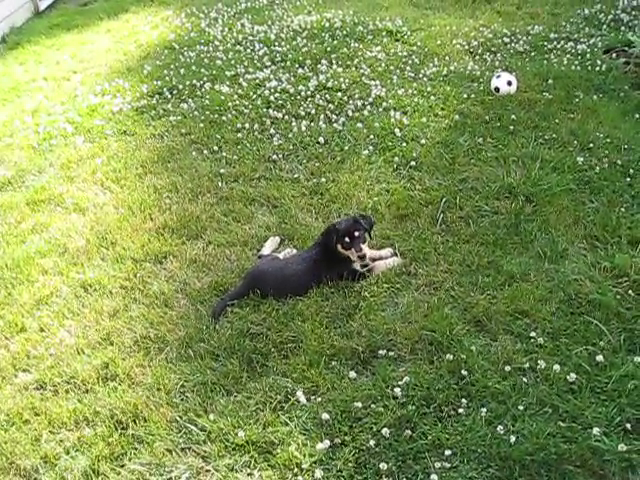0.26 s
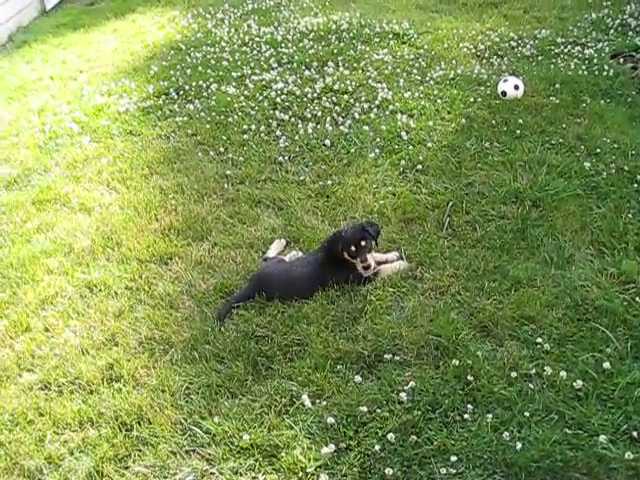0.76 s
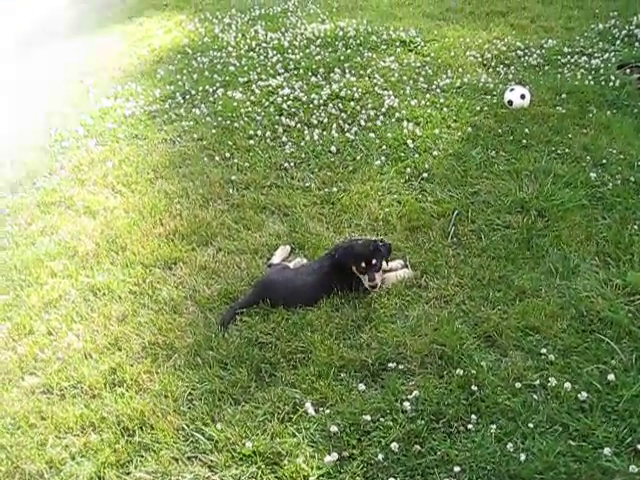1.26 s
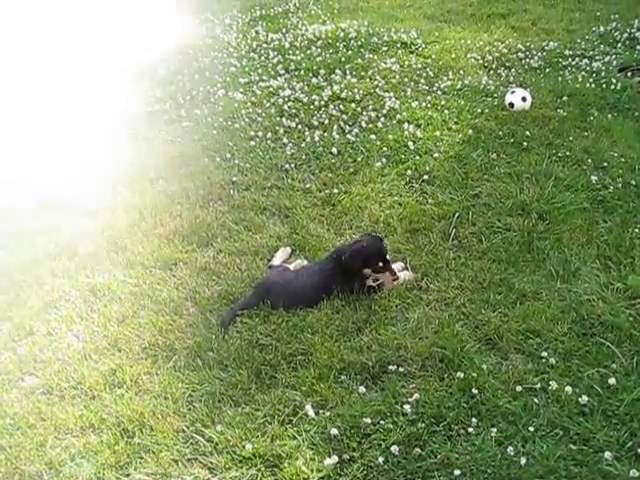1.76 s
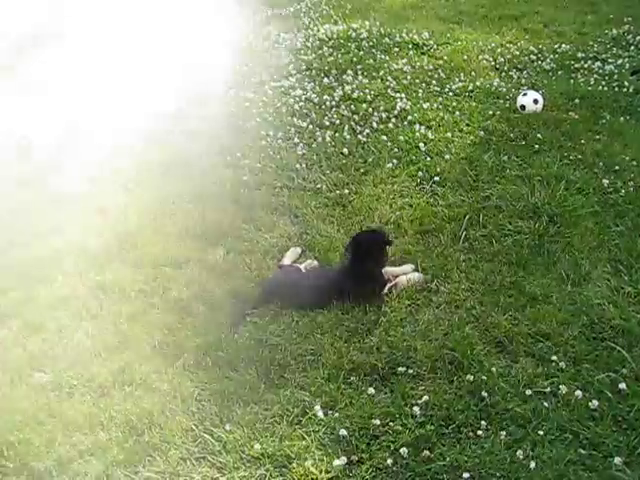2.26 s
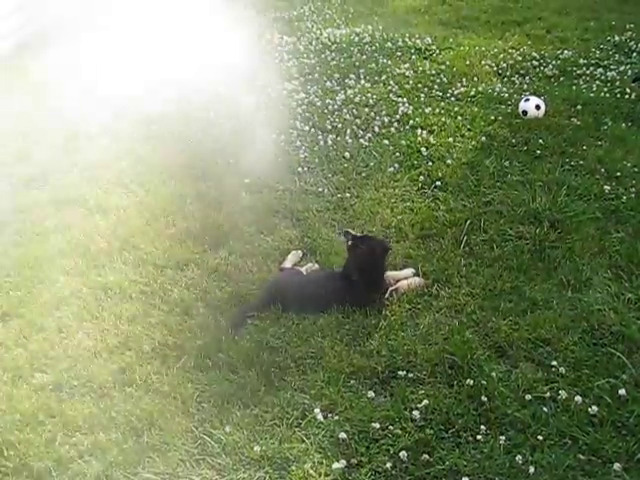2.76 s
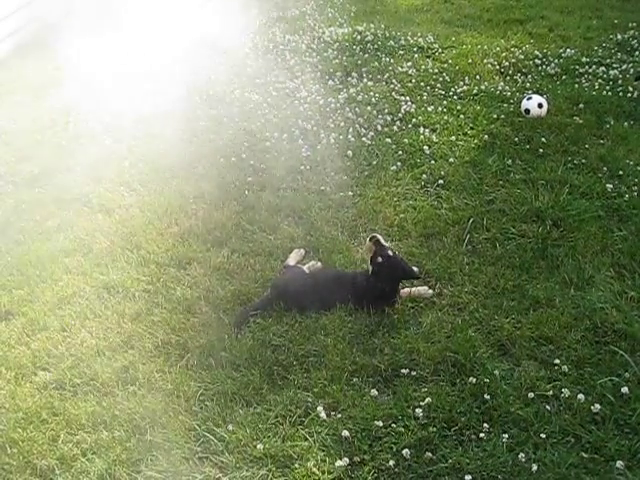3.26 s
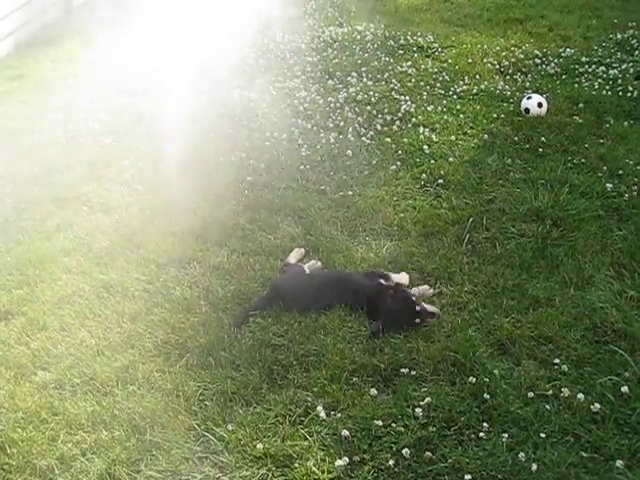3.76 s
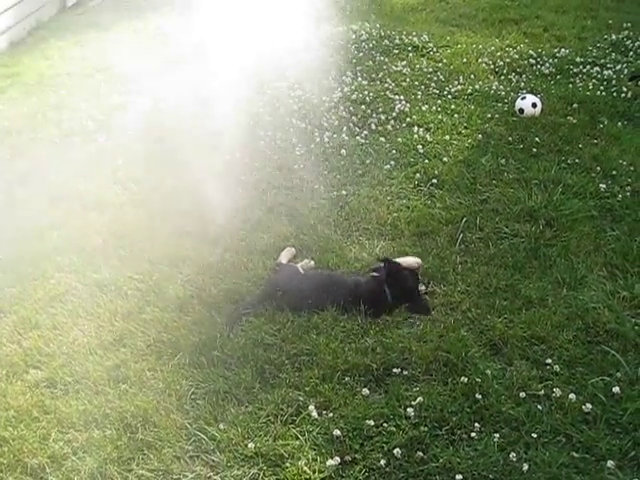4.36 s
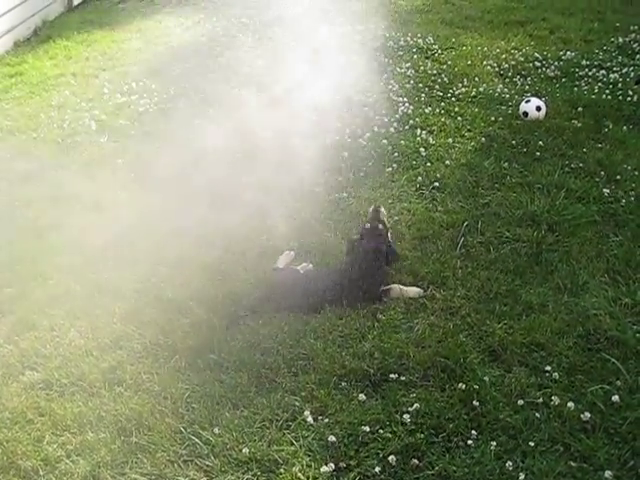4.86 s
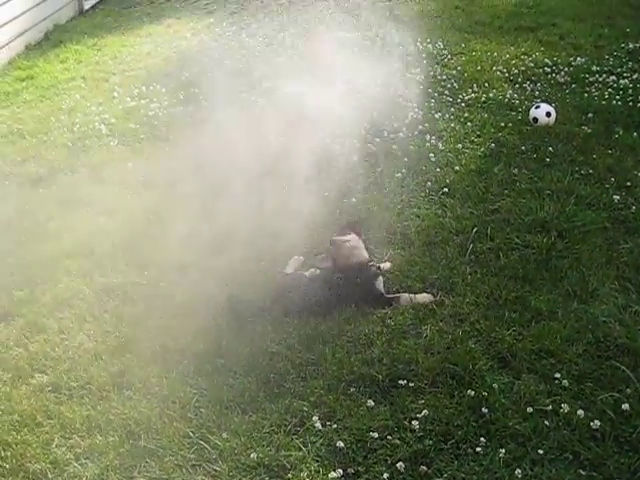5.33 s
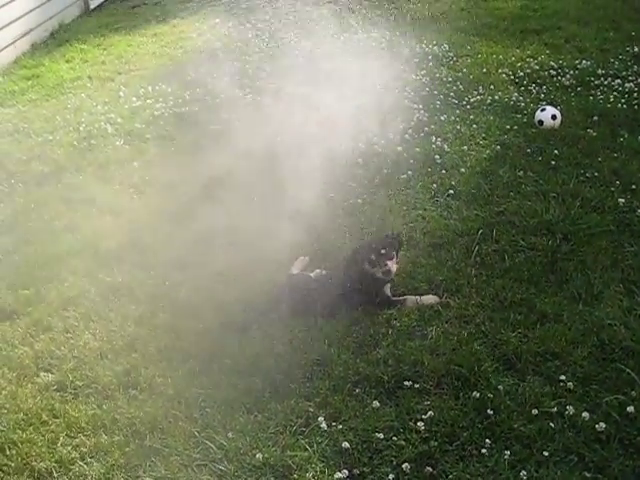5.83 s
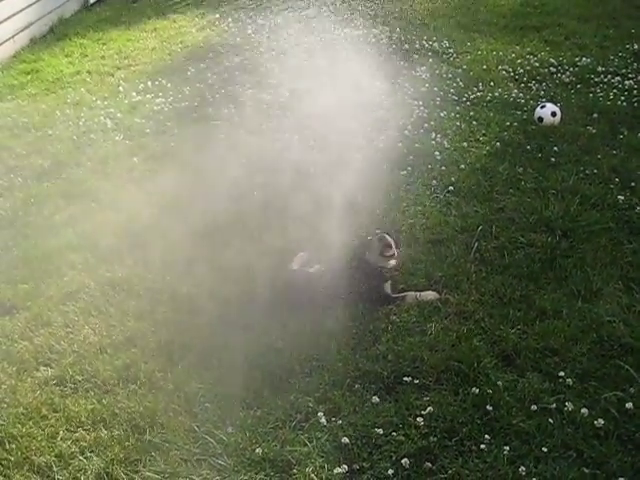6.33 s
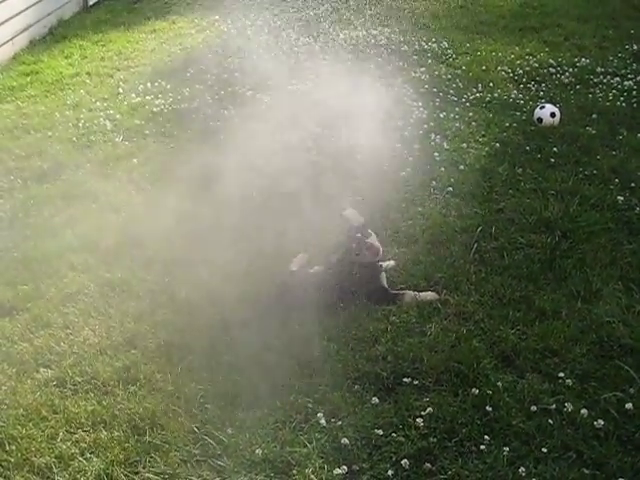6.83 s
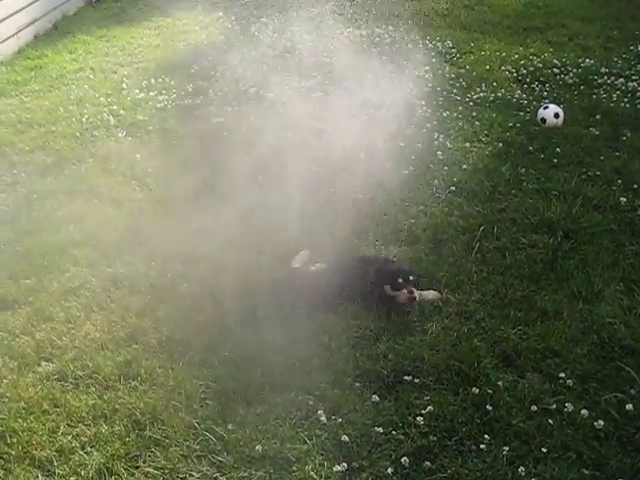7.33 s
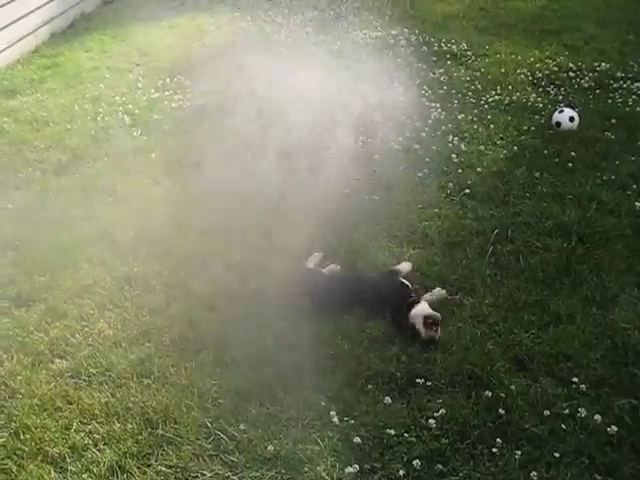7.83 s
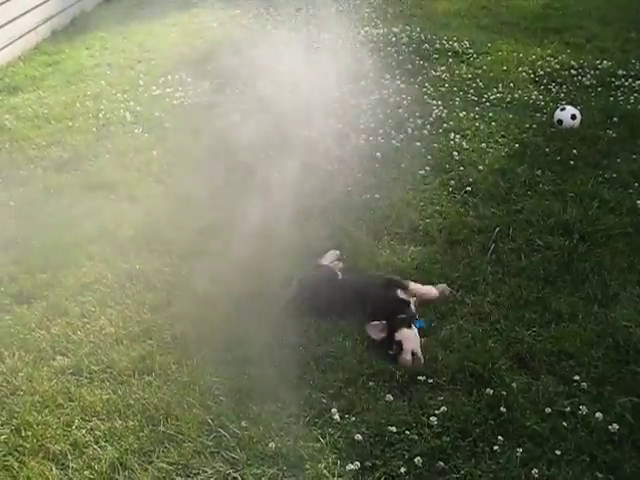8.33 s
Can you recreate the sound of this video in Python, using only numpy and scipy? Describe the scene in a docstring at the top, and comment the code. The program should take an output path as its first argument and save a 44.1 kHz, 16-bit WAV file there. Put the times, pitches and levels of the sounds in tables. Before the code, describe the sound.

A pressurised water spray hisses steadily over a lawn, brightening as it opens into mist, with a faint motor hum and a few small bird whistles.

```python
"""A pressure washer sprays a fine mist over a lawn, heard by one hand-held microphone close to the wand.
From the start: hiss (noise shaped by resonances), a pump hum behind (shaft-locked tones) and soft bumps
(ringing modes). The nozzle is twisted from tight jet to fan over 0.3-1.5 s and the wand swings nearer,
so the hiss brightens. A small bird whistles (gliding sines, faint echo) at 2.1-6.3 s; the grip
knocks near 5 and 6 s; hiss, hum and bumps run on to the end."""
import sys
import numpy as np
from scipy import signal
from scipy.io import wavfile

SR = 44100
rng = np.random.default_rng(int(sys.argv[2]) if len(sys.argv) > 2 else 0)


def store_wav(level_fs):
    """Save 16-bit WAV to argv[1]."""
    pcm = np.round(np.clip(np.atleast_2d(level_fs), -1, 1) * 32767)
    wavfile.write(sys.argv[1], SR, pcm.T.astype(np.int16))


N = 378819


def from_db(db):
    """Decibels to gain."""
    return 10 ** (np.asarray(db) / 20)


def in_time(rows, t):
    """Columns of a time table, interpolated at t."""
    s, *columns = np.transpose(rows)
    return [np.interp(t, s, column) for column in columns]


def at_hz(points, hz):
    """Spectrum table read on a log-frequency axis."""
    freqs, values = np.transpose(points)
    return np.interp(np.log(hz), np.log(freqs), values)


def bells(modes, hz):
    """Summed dB of bell-shaped peaks and hollows."""
    return sum(db * np.exp(-((hz - centre) / width) ** 2) for centre, width, db in modes)


def drift(rate_hz):
    """Random values of spread near 1, rate_hz a second, joined by straight lines."""
    knots = rng.standard_normal(4096)
    return np.interp(np.arange(N) / SR * rate_hz, np.arange(len(knots)), knots)


def nozzle_opening(t):
    """One smooth twist of the nozzle; 0 = tight jet, 1 = full fan."""
    twist_at_s, twist_takes_s, first_opening = 0.31, 1.22, 0.19
    done = np.clip((t - twist_at_s) / twist_takes_s, 0, 1)
    return first_opening + (1 - first_opening) * np.sin(np.pi / 2 * done) ** 2


def spray(level_db=0.28, flutter_db=0.31, flutter_rate_hz=36, swell_db_per_s=0.0135):
    """Turbulence at the nozzle, coloured by resonances that change as it opens."""
    # broad colour of the jet: f/Hz, level/dB
    jet_colour = [(120, -36.5), (450, -35), (750, -31), (1000, -23), (1800, -22), (3000, -21.0),
                  (5000, -18), (8000, -22.5), (11000, -29.5), (15500, -34.5)]
    # resonances of the nozzle's bore: f/Hz, width/Hz, level/dB
    bore_modes = [(1027, 72, 4.5), (1297, 114, -3), (1490, 210, 6.0), (1460, 47, 2.5)]
    # drift of the bore resonances: t/s, pitch factor, depth factor
    bore_drift = [(0, .998, 0.93), (2.5, 1.001, 1.04), (6.75, 0.99, 1.01), (7.7, 1.02, 1.25)]
    # broad colour of the tight jet against the fan: f/Hz, level/dB
    tight_tilt = [(1700, 0), (3500, -4), (8000, -4.0), (12200, 1.5)]
    # peaks and hollows of the tight jet: f/Hz, width/Hz, level/dB
    tight_modes = [(2140, 94, -10), (2997, 200, 5.5), (3988, 168, -3.8), (4528, 277, 3), (6220, 260, -9),
                   (6741, 273, -0.5), (7324, 280, -9.5), (8540, 540, -9), (10279, 420, 0.5),
                   (11559, 695, -7)]
    # peaks and hollows of the open fan, wand head-on: f/Hz, width/Hz, level/dB
    fan_modes = [(2140, 152, -7), (2405, 77, 2), (3066, 377, 4), (4150, 150, -2.5), (4640, 166, -7),
                 (5350, 220, 3.5), (5870, 520, -13.5), (6700, 238, 2), (7430, 310, 2), (8850, 180, 2),
                 (9630, 400, -7.5), (11500, 603, 2.5), (13739, 515, 4.5), (14720, 330, -2.2)]
    # hollow passing through the top of the hiss as the fan spreads: t/s, f/Hz, level/dB
    hollow_path = [(0.5, 11600, 1), (1.0, 12100, -5), (1.5, 12200, -5), (1.9, 12400, 0)]
    # how squarely the wand points at the microphone, as a top-treble level: t/s, level/dB
    wand_aim = [(0.0, -48.5), (0.93, -46.5), (1.58, -45), (1.96, -42), (2.65, -42), (3.47, -41.5),
                (4.14, -39), (4.52, -36), (6.94, -35.5), (7.56, -37.5), (8.59, -35)]
    # short waves are beamed, so treble depends most on aim: f/Hz, share of the aim's swing
    beaming = [(1400, 0.11), (5200, 0.16), (7300, .45), (9200, 0.52), (11000, 0.88), (12000, 1.06),
               (15000, 1.12)]
    head_on_db, hollow_width_hz = -36.0, 550
    fan_rise_per_db = .0018  # fan modes rise by this share as the wand turns away

    noise = rng.standard_normal(N)
    hz, t, turbulence = signal.stft(noise, SR, nperseg=1024, noverlap=768)
    hz = np.maximum(hz, 1)[:, None]
    opening = nozzle_opening(t)
    away_db = head_on_db - in_time(wand_aim, t)[0]

    pitch, depth = in_time(bore_drift, t)
    bore_db = depth * bells(bore_modes, hz / pitch)
    fan_db = bells(fan_modes, hz / (1 + fan_rise_per_db * away_db))
    tight_db = at_hz(tight_tilt, hz) + bells(tight_modes, hz)
    colour_db = at_hz(jet_colour, hz) + bore_db + opening * fan_db + (1 - opening) * tight_db
    hollow_hz, hollow_db = in_time(hollow_path, t)
    colour_db = colour_db + bells([(hollow_hz, hollow_width_hz, hollow_db)], hz)

    # the wand creeps nearer all the while
    nearing_db = level_db + swell_db_per_s * (t - t.mean())
    gain = from_db(nearing_db - away_db * at_hz(beaming, hz) + colour_db)
    hiss = signal.istft(turbulence * gain, SR, nperseg=1024, noverlap=768)[1][:N]
    # the sheet of water breaks up unevenly
    hiss = hiss * from_db(flutter_db * drift(flutter_rate_hz))
    # so small a source radiates little bass
    return signal.sosfilt(signal.butter(1, 65, "high", fs=SR, output="sos"), hiss)


def pump(shaft_hz=58.5, speed_wander=0.00123, waver_db=2.0, level_db=-2.0):
    """Motor and pump tones locked to a shaft whose speed wanders a little under load."""
    # hum: multiple of the shaft rate, relative level/dB
    shaft_tones = [(2.1, -62.5), (4, -64), (6, -60.5), (15, -55), (18, -49.5), (20, -57), (23, -54),
                   (32, -58), (34, -51), (35, -63), (36, -53.5)]
    turns = np.cumsum(shaft_hz * (1 + speed_wander * drift(3))) / SR
    hum = np.zeros(N)
    for multiple, db in shaft_tones:
        gain = from_db(db + waver_db * drift(5))
        hum += gain * np.sin(2 * np.pi * (multiple * turns + rng.random()))
    return np.sqrt(2) * from_db(level_db) * hum


def ring(hits, hz, t60_s):
    """Each hit (t/s, level/dB) sets a decaying sine ringing in a two-pole resonator."""
    clicks = np.zeros(N)
    for s, db in hits:
        clicks[int(s * SR)] = from_db(db)
    r = np.exp(-np.log(1000) / (t60_s * SR))
    w = 2 * np.pi * hz / SR
    return signal.lfilter([0, np.sin(w)], [1, -2 * r * np.cos(w), r * r], clicks + 1e-18)


def handling(bump_hz=50, bump_t60_s=0.056, bump_db=3.5, thud_hz=95, thud_t60_s=.04, thud_db=7.0):
    """Hand on microphone: dull bumps in two low modes, two light knocks in the grip's modes."""
    # firmest bumps: t/s, relative level/dB
    firm_bumps = [(0.199, -49), (0.409, -49), (1.149, -48), (2.069, -47), (3.149, -49), (3.919, -48.5),
                  (5.359, -51), (6.279, -48), (6.929, -47), (6.999, -46), (7.439, -49), (8.229, -50)]
    # small knocks of the grip: t/s, relative level/dB
    grip_knocks = [(4.979, -38), (5.930, -34)]
    # modes of the grip: f/Hz, level/dB, t60/s
    grip_modes = [(407, -12, .05), (530, -2, .04), (660, 2, .05)]
    # lighter bumps fall at random in between
    light_per_s, light_db, light_spread_db = 1.7, -52, 1.5

    light_s = np.flatnonzero(rng.random(N) < light_per_s / SR) / SR
    light_bumps = [(s, light_db + light_spread_db * rng.standard_normal()) for s in light_s]
    hits = list(firm_bumps) + light_bumps
    bumps = from_db(bump_db) * ring(hits, bump_hz, bump_t60_s)
    thuds = from_db(thud_db) * ring(hits, thud_hz, thud_t60_s)
    knocks = sum(from_db(db) * ring(grip_knocks, hz, t60_s) for hz, db, t60_s in grip_modes)
    return bumps + thuds + knocks


def glide(start_hz, fall_hz_per_s, length_s):
    """Pitch and swell of a note that falls in a straight line."""
    t = np.arange(int(length_s * SR)) / SR
    return start_hz - fall_hz_per_s * t, np.sqrt(np.sin(np.pi * t / length_s))


def bird(quaver=0.007, echo_s=.034, echo_db=-17):
    """Pure whistles of three kinds (slurs, pips, arches), with one faint echo off a wall."""
    # downward slurs: t/s, start f/Hz, level/dB
    slurs = [(2.148, 3600, -34), (2.199, 3000, -29), (4.468, 2660, -35), (6.208, 3340, -36)]
    slur_s, slur_fall_hz_per_s = .05, 10000
    # short pips on one sagging pitch: t/s, level/dB
    pips = [(2.688, -31), (2.718, -33), (2.86, -32), (3.928, -29), (4.1, -27), (4.13, -32)]
    pip_hz, pip_s, pip_sag_hz_per_s = 2690, 0.029, 1800
    # arched calls: t/s, level/dB
    arch_calls = [(3.237, -27.5), (4.51, -25)]
    # arch: soft lead-in, up, a catch at the top, down: t into call/s, f/Hz, relative level/dB
    arch = [(0, 2360, -13), (.026, 2400, -8), (.042, 2630, 1), (.06, 2810, 0), (.079, 2920, -7),
            (.096, 2860, -11), (.118, 2660, -5), (.145, 2490, -9.5), (.195, 2310, -15)]

    arch_t = np.arange(int(arch[-1][0] * SR)) / SR
    arch_hz, arch_db = in_time(arch, arch_t)
    notes = [(s, db, arch_hz, from_db(arch_db)) for s, db in arch_calls]
    notes += [(s, db, *glide(pip_hz, pip_sag_hz_per_s, pip_s)) for s, db in pips]
    notes += [(s, db, *glide(hz, slur_fall_hz_per_s, slur_s)) for s, hz, db in slurs]

    song = np.zeros(N)
    wobble = 1 + quaver * drift(250)
    for s, db, hz, swell in notes:
        span = int(s * SR) + np.arange(len(hz))
        phase = 2 * np.pi * np.cumsum(hz * wobble[span]) / SR
        song[span] += np.sqrt(2) * from_db(db) * swell * np.sin(phase)
    return song + from_db(echo_db) * np.roll(song, int(echo_s * SR))


def scene():
    """One microphone feeds both channels."""
    garden = spray() + pump() + handling() + bird()
    return np.array([garden, garden])


def record(dry, cutoff_hz=15750):
    """The top is cut steeply."""
    return signal.sosfilt(signal.ellip(12, .1, 80, cutoff_hz, fs=SR, output="sos"), dry)


dry = scene()
out = record(dry)
store_wav(out)
```